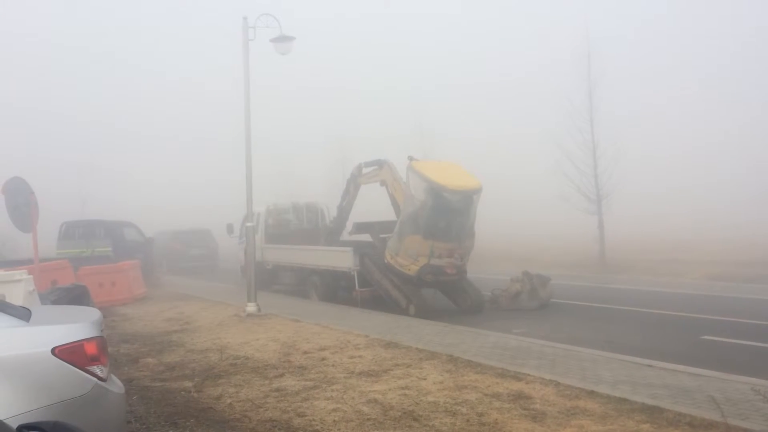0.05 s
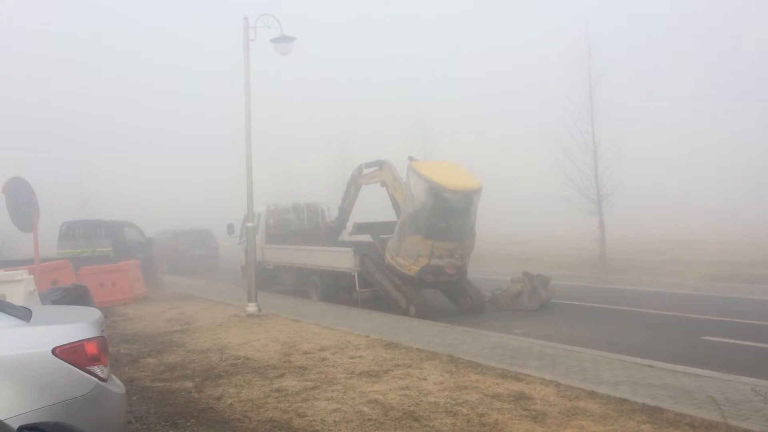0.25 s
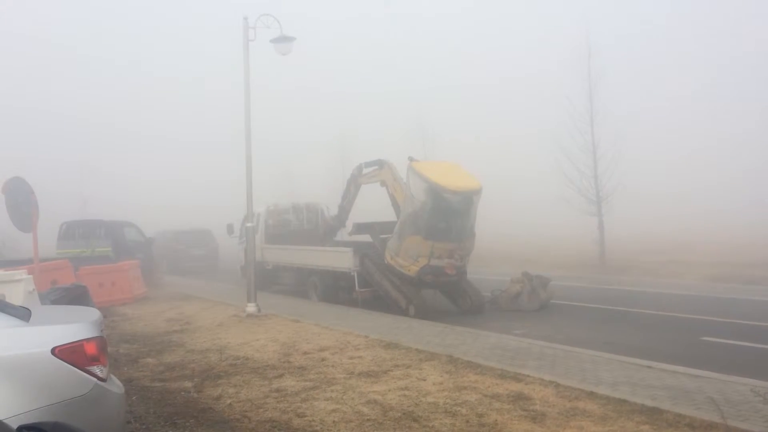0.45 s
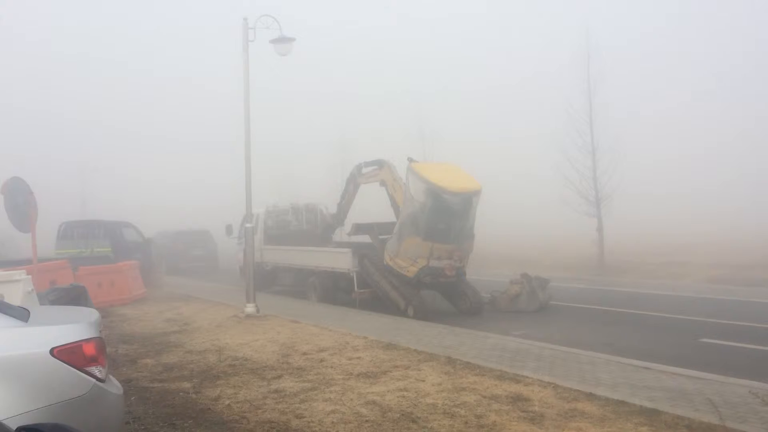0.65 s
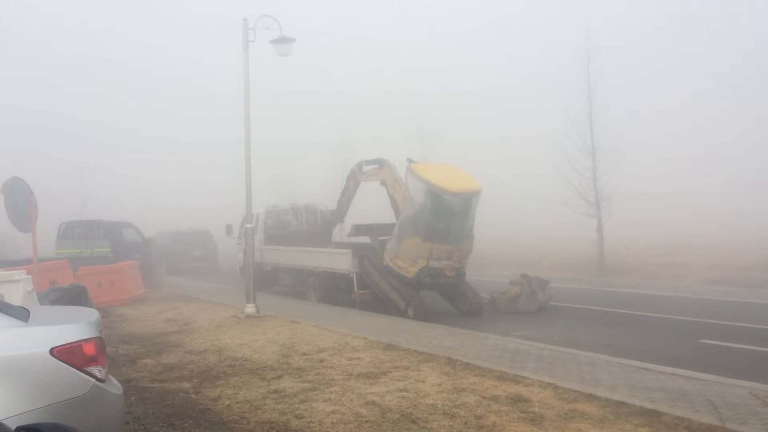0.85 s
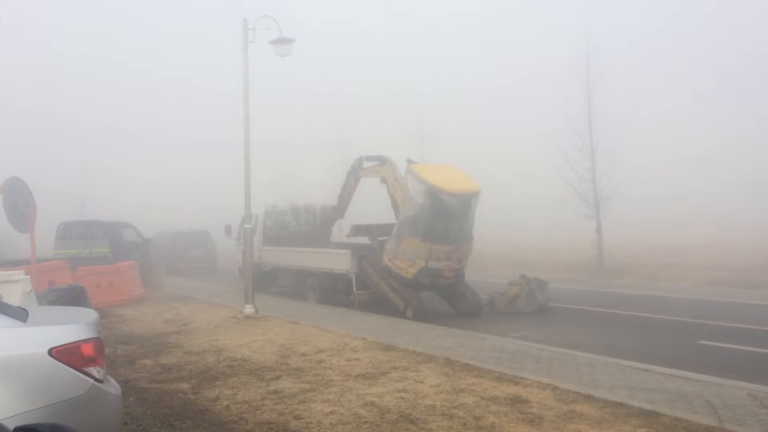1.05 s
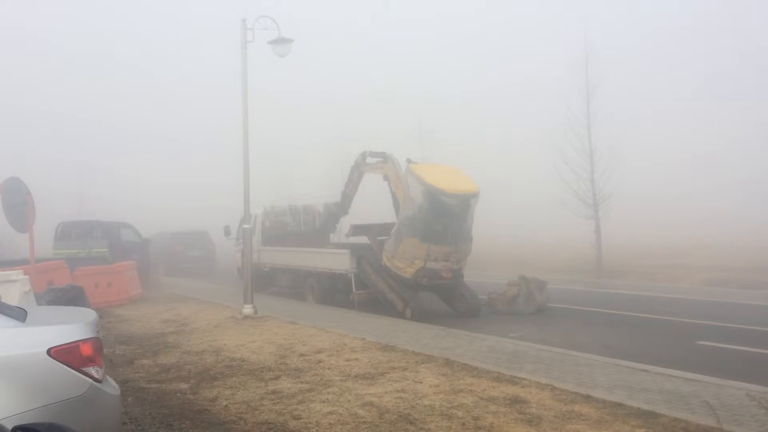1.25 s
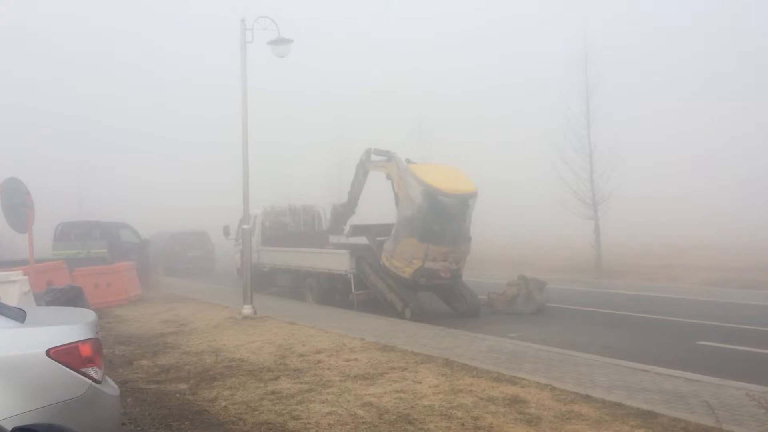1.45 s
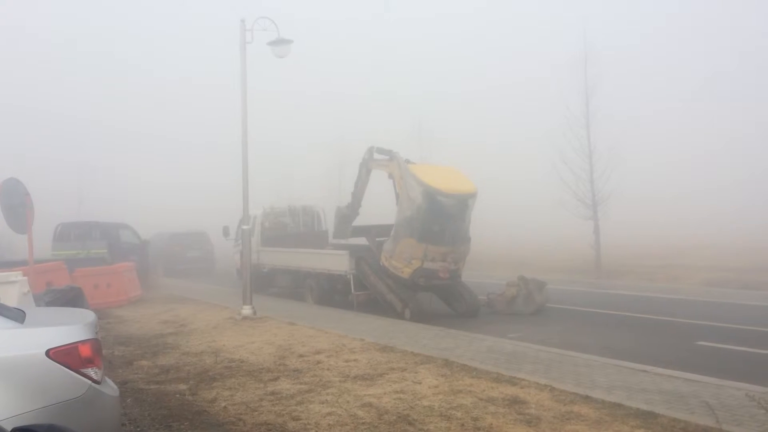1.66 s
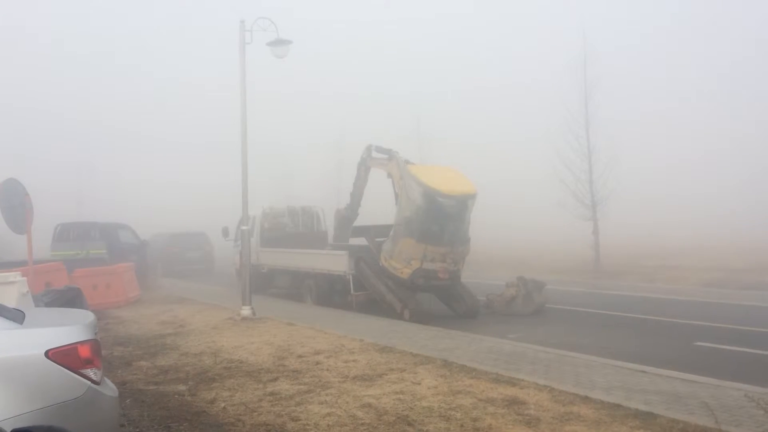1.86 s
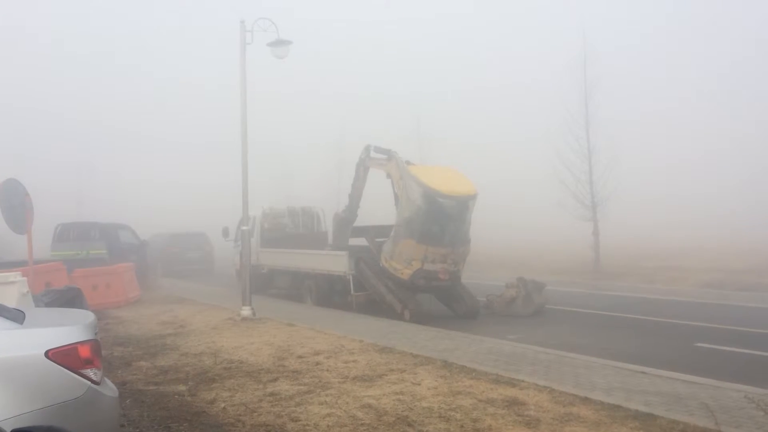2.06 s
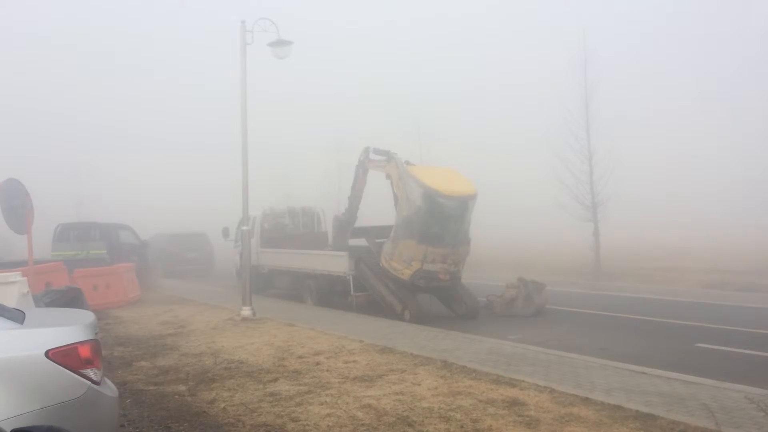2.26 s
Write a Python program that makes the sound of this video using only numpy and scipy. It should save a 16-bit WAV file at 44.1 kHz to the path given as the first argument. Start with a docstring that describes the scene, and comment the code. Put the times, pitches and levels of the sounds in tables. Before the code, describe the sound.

Steel bangs loudly twice on a truck bed, ringing briefly with a thump and a low rumble. A small excavator's diesel engine sags, then chugs on outdoors, with light clinks and a couple of soft knocks.

```python
"""Two loud metal bangs ring out over the chugging of a small diesel excavator outdoors.
Its steel comes down on the bed of a truck: sheet metal crashes and rings, the chassis thumps,
loose parts clink and the bed rumbles. The engine, a quick run of exhaust puffs and rattles,
sags after the jolt and chugs on, with a few light knocks from the arm.
A faint fan whine and a steady rush of air lie behind it all."""
import sys
import numpy as np
from scipy import signal
from scipy.fft import rfft, irfft, next_fast_len
from scipy.io import wavfile
from scipy.ndimage import uniform_filter1d, minimum_filter1d

SR = 44100
rng = np.random.default_rng(int(sys.argv[2]) if len(sys.argv) > 2 else 0)


def file_out(sig):
    """Save sig as 16-bit WAV at sys.argv[1]."""
    # one column per channel
    cols = np.atleast_2d(sig).T
    # limit, then scale
    lim = np.clip(cols, -1, 1)
    pcm = np.round(lim * 32767).astype(np.int16)
    wavfile.write(sys.argv[1], SR, pcm)


N = 101429
T = np.arange(N) / SR
HIT_RISE_S = 0.0014
BASS_HZ, MIDDLE_HZ, PLAIN_HZ, TREBLE_HZ = 330, 900, 2360, 4500   # where a blow's tone is set

# Blows of steel on the truck bed. A "ring time" is how long a sound takes to fall by 60 dB.
# (time [s], level [dB], extra bass [dB], extra middle [dB], extra treble [dB], ring time [s])
BLOWS = [(0.228, -16, -17, -37, -4.5, .12), (.2328, -7.5, -0.5, 1, -1, 0.18),
         (.402, -20, 7, -3.5, 0.5, 0.37), (0.4064, -15, 2.5, -8.5, -1, 0.12),
         (.447, -27, -4, 3, -22, 0.069), (0.471, -33, 4, -14, 10, 0.28)]
# how fast the engine runs: (time [s], firing rate [Hz])
ENGINE_SPEED = [(0, 44.4), (.3, 47), (.42, 48.2), (.6, 45.7), (.8, 49), (1.4, 47.5), (2.1, 47.4), (2.3, 47)]
# how hard the engine works, heard as loudness: (time [s], level [dB])
ENGINE_LOAD = [(0, -5.5), (.2, -4.5), (.58, -9.5), (.76, 0), (1.05, -3), (1.4, -1), (1.85, 0.5),
               (2.3, -0.5)]


def crash(rise_cycles=0.83, bass_linger=0.027):
    """Struck sheet metal shakes at countless pitches; low ones swell slower and last a bit longer."""
    # tone of the sheet metal: (frequency [Hz], level [dB])
    sheet_tone = [(40, -4), (80, -3), (140, 5), (220, 0), (320, 4.5), (450, -1.5), (700, 2), (1050, 0),
                  (1450, -7.5), (1900, -4), (2450, -6.5), (2900, -10.5), (3400, -5), (3850, 0), (4500, -7),
                  (5200, -14), (6200, -26), (7500, -33), (10000, -48.5), (15000, -62)]
    spectrum = rfft(noise(sheet_tone))
    bin_hz = np.arange(len(spectrum)) * SR / N
    out = np.zeros(N)
    for low_hz in 35 * 2.0 ** np.arange(9):   # one octave at a time
        band = irfft(spectrum * ((bin_hz >= low_hz) & (bin_hz < 2 * low_hz)), N)
        hz = low_hz * np.sqrt(2)
        rise = HIT_RISE_S + rise_cycles / hz
        linger = (MIDDLE_HZ / hz) ** bass_linger
        power = sum((blow_gain(blow, hz) * struck(blow[0], rise, blow[-1] * linger)) ** 2
                    for blow in BLOWS)
        out += band * np.sqrt(power)
    return out


def ringing(level_db=-1, spread_db=2.5):
    """Every blow sets the steel's strongest notes ringing, each time in a slightly different mix."""
    # natural notes of the steel: (pitch [Hz], level [dB], ring time [s])
    steel_notes = [(313, -13, .25), (529, -24, .55), (872, -18, .22), (1000, -11, .12), (1125, -14, .14),
                   (1225, -17, .18), (1322, -19, .22), (1825, -21, .35), (1987, -22, .33), (2310, -15, .1),
                   (2460, -14, .1), (2548, -15, .11), (3420, -20, .17), (3582, -16, .14), (3754, -19, .14),
                   (3931, -20, .14), (4021, -24, .19), (4382, -21, .14)]
    out = np.zeros(N)
    for blow in BLOWS:
        start = blow[0]
        for hz, db, ring_s in steel_notes:
            gain = blow_gain(blow, hz) * from_db(level_db + db + spread_db * rng.standard_normal())
            out += gain * struck(start, HIT_RISE_S, ring_s) * sine(hz, start)
    return out


def clanks():
    """A steel edge lands and adds a short, hard note to each crash."""
    # landings of the edge: (time [s], level [dB])
    landings = [(0.231, -15), (0.408, -15.5)]
    # natural notes of the edge: (pitch [Hz], level [dB], ring time [s])
    edge_notes = [(2290, -5.5, .04), (2430, -4.5, .05), (2558, -3, 0.072), (4520, -13, 0.11)]
    return sum(from_db(db + note_db) * struck(start, HIT_RISE_S, ring_s)
               * np.sin(2 * np.pi * (hz * T + rng.random()))
               for start, db in landings for hz, note_db, ring_s in edge_notes)


def thumps():
    """The chassis shakes on its springs: a few heavy swings that swell and die away."""
    # shakes of the chassis: (time [s], pitch [Hz], level [dB], swell [s], fade [s])
    shakes = [(0.255, 144.3, -13.5, 0.028, 0.017), (.401, 316.5, -14, 0.005, 0.041),
              (.413, 84.3, -15.5, 0.021, 0.041)]
    return sum(from_db(db) * np.interp(T - start, [0, swell, swell + fade], [0, 1, 0]) * sine(hz, start)
               for start, hz, db, swell, fade in shakes)


def engine(rough_db=1.4, surge_db=1.0, clatter_db=-40, load_share=0.35, alike=0.14):
    """Each firing of the diesel puffs from the exhaust, then rattles the engine block."""
    # exhaust note and drone of the block: (multiple of the firing rate [x], level [dB])
    exhaust_notes = [(1, -48.5), (2, -35.5), (3, -37.5), (4, -57), (5, -65), (6, -60), (7, -54.5),
                     (10, -60.5), (12, -59), (16, -54), (17, -62), (19, -68), (20, -55), (21, -61.5)]
    # tone of the rattling block and covers: (frequency [Hz], level [dB])
    clatter_tone = [(20, -38), (200, 1), (310, 0.5), (410, -4), (520, -2), (630, 2.5), (700, -6),
                    (780, 0.5), (950, -1), (1120, -14.5), (1370, -13.5), (1550, -7.5), (1850, -6),
                    (2250, -12.5), (2480, -7.5), (2700, -17), (2950, -6), (3220, -2), (3380, -5.5),
                    (3560, -0.5), (3750, -7), (4400, -11), (5100, -19.5), (5700, -26), (7000, -37),
                    (9500, -52), (15000, -56)]
    first_firing_s, lag_s, rise_s, decay_s = 0.00102, 0.002497, 0.0047, 0.0085
    rate, load_db = in_time(ENGINE_SPEED), in_time(ENGINE_LOAD)
    firings = np.cumsum(rate) / SR - first_firing_s * rate[0]
    puffs = np.zeros(N)
    for multiple, db in exhaust_notes:
        phase = (multiple > 7) * rng.uniform(0, 2 * np.pi)   # low notes line up to form the puff
        puffs -= np.sqrt(2) * from_db(db) * np.cos(2 * np.pi * round(multiple) * firings + phase)
    puffs *= from_db(load_db + rough_db * drift(45) + surge_db * drift(12))

    rattles = firings - lag_s * rate[0] + 2   # the 2 keeps this count above zero
    age = rattles % 1 / rate
    burst = np.minimum(age / rise_s, 1) * np.exp(-np.maximum(age - rise_s, 0) / decay_s)
    envelope = 0.43 + burst   # some rattle goes on between firings
    strength = from_db(rng.standard_normal(N)[rattles.astype(int)])   # each varies by about 1 dB
    repeated = np.interp(age * SR, np.arange(N), rng.standard_normal(N))   # same in every firing
    rattle = np.sqrt(alike) * repeated + np.sqrt(1 - alike) * rng.standard_normal(N)
    clatter = coloured(rattle * envelope * strength, clatter_tone)
    return puffs + from_db(clatter_db + load_share * load_db) * clatter


def knocks(rise_cycles=2.2):
    """The hollow arm knocks, sounding a few close notes that die quickly."""
    # knocks of the arm: (time [s], level [dB])
    hits = [(1.2285, -24), (1.607, -31)]
    # natural notes of the arm: (pitch [Hz], level [dB], ring time [s])
    arm_notes = [(498, -9, 0.049), (554, -0.5, 0.046), (587, -9, 0.055)]
    return sum(from_db(db + note_db) * struck(start, rise_cycles / hz, ring_s) * sine(hz, start)
               for start, db in hits for hz, note_db, ring_s in arm_notes)


def clinks():
    """Loose parts tap together in short, bright bursts of noise."""
    # taps of the parts: (time [s], level [dB], ring time [s])
    taps = [(.055, -41.5, 0.11), (0.484, -32, 0.13), (.617, -41, 0.25), (.838, -38, 0.15),
            (0.919, -40, 0.098), (1.027, -43, 0.082), (1.2645, -31, 0.014), (1.273, -38, .06),
            (2.116, -38.5, .06)]
    # tone of a tap: (frequency [Hz], level [dB])
    tap_tone = [(100, -40), (800, -26), (2000, 1), (2800, -0.5), (3600, 0.5), (4500, 3.5), (5500, -15),
                (8000, -33), (15000, -45)]
    return bursts(taps, tap_tone)


def grit(rough_db=2.0):
    """Grit crushed under the steel gives a faint, high crunch."""
    # crunches: (time [s], level [dB], ring time [s])
    crunches = [(.24, -55, 0.35), (.425, -56, 0.26), (.472, -54, 0.1), (.619, -67, .1), (.842, -69, .1),
                (.921, -68, .08)]
    # tone of the grit: (frequency [Hz], level [dB])
    grit_tone = [(4000, -13), (7000, 2), (11000, -7), (14500, -10), (16000, -13)]
    return bursts(crunches, grit_tone) * from_db(rough_db * drift(500))


def rumble():
    """The truck bed rumbles as the weight on it shifts."""
    # swells of the rumble: (time [s], level [dB])
    swells = [(0, -49.5), (.4, -38), (.48, -26), (.55, -37), (.65, -47), (.76, -40), (.86, -33.5),
              (.96, -38), (1.06, -50), (2.3, -53)]
    # tone of the bed: (frequency [Hz], level [dB])
    bed_tone = [(15, -50), (40, -15), (90, 4.5), (170, 1.5), (330, -5), (500, -13), (1000, -20),
                (4000, -46), (15000, -88)]
    return from_db(in_time(swells)) * noise(bed_tone)


def echo(sound, level_db=-28.5, delay_s=0.035, ring_s=0.78, cutoff_hz=8600):
    """Sound bounces faintly back from the road and parked vehicles."""
    tail = signal.sosfilt(signal.butter(2, cutoff_hz, fs=SR, output="sos"), rng.standard_normal(N))
    tail *= struck(delay_s, HIT_RISE_S, ring_s)
    tail /= np.sqrt(np.sum(tail ** 2))
    return from_db(level_db) * signal.fftconvolve(sound, tail)[:N]


def fan(idle_firing_hz=47.5, waver_db=2.0):
    """The cooling fan and pump whine, higher as the engine speeds up and louder as it works harder."""
    # notes of the fan and pump: (pitch at idle [Hz], level [dB])
    whines = [(523, -54), (634, -54.5), (855, -55.5)]
    engine_time = np.cumsum(in_time(ENGINE_SPEED) / idle_firing_hz) / SR
    return sum(np.sqrt(2) * from_db(db + in_time(ENGINE_LOAD) + waver_db * drift(30))
               * np.sin(2 * np.pi * hz * engine_time) for hz, db in whines)


def air(level_db=-39.5):
    """The cooling fan and the open air make a steady, low rush."""
    # tone of the rush: (frequency [Hz], level [dB])
    air_tone = [(8, -36), (20, -22), (35, -9), (60, 8.5), (120, 9), (170, 4.5), (240, -8.5), (450, -12.5),
                (900, -7.5), (1300, -14), (2700, -18.5), (3600, -9.5), (4800, -17), (5800, -33),
                (7500, -34), (9500, -45.5), (15000, -49)]
    return from_db(level_db) * noise(air_tone)


def blow_gain(blow, hz):
    """How strongly one blow shakes the metal at a given frequency."""
    _, db, bass_db, middle_db, treble_db, _ = blow
    tone = [(BASS_HZ, bass_db), (MIDDLE_HZ, middle_db), (PLAIN_HZ, 0), (TREBLE_HZ, treble_db)]
    return from_db(db + at_hz(tone, hz))


def struck(start, rise, ring_s):
    """Loudness of a hit over time: a quick rise, then a fall of 60 dB in ring_s seconds."""
    age = np.maximum(T - start, 0)
    return np.minimum(age / rise, 1) * from_db(-60 * np.maximum(age - rise, 0) / ring_s)


def sine(hz, start):
    """A pure note that passes through zero at the start time."""
    return np.sin(2 * np.pi * hz * (T - start))


def bursts(hits, tone):
    """A fading burst of noise for each hit."""
    return noise(tone) * sum(from_db(db) * struck(start, HIT_RISE_S, ring_s) for start, db, ring_s in hits)


def noise(tone):
    """Steady noise with the given tone."""
    return coloured(rng.standard_normal(N), tone)


def coloured(sound, tone):
    """Turn each frequency up or down to match a tone table; the result has average size 1."""
    size = next_fast_len(N)
    gain = from_db(at_hz(tone, np.arange(size // 2 + 1) * SR / size))
    return rms_one(irfft(rfft(sound, size) * gain, size)[:N])


def drift(rate_hz):
    """A smooth random wobble of average size 1."""
    width = max(int(SR / rate_hz), 2)
    smoothed = uniform_filter1d(rng.standard_normal(N), width, mode="wrap")
    return rms_one(uniform_filter1d(smoothed, width, mode="wrap"))


def at_hz(tone, hz):
    """Read a tone table between its rows, giving every octave the same width."""
    row_hz, db = np.transpose(tone)
    return np.interp(np.log(np.maximum(hz, 1)), np.log(row_hz), db)


def in_time(rows):
    """Join (time, value) points with straight lines."""
    return np.interp(T, *np.transpose(rows))


def rms_one(x):
    """Scale a signal so that its average size (root mean square) is 1."""
    return x / np.sqrt(np.mean(x ** 2) + 1e-20)


def from_db(db):
    """Turn decibels into a number to multiply by."""
    return 10 ** (np.asarray(db) / 20)


def scene():
    """The metal sounds and their echo over the engine, the rumbling bed and the air, in mono."""
    metal = crash() + ringing() + clanks() + thumps() + knocks() + clinks() + grit()
    bed = rumble()
    return (metal + echo(metal) + engine() + bed + fan() + air())[None]


def record(dry, ceiling=0.87, window_samples=177, stop_hz=16600):
    """A quick limiter turns down the loudest peaks, then a filter cuts the highest treble."""
    needed_gain = np.minimum(1, ceiling / (np.abs(dry) + 1e-9))
    gain = uniform_filter1d(minimum_filter1d(needed_gain, size=window_samples), size=window_samples)
    return signal.sosfilt(signal.cheby2(12, 70, stop_hz, fs=SR, output="sos"), dry * gain)


dry = scene()
out = record(dry)
file_out(out)
```